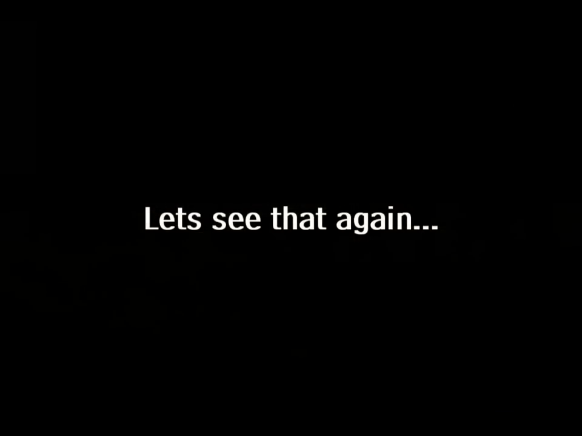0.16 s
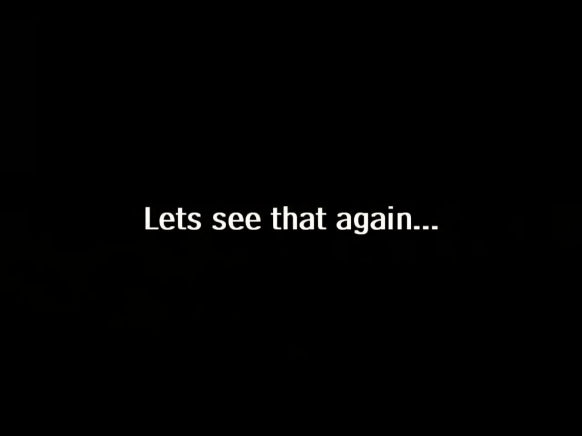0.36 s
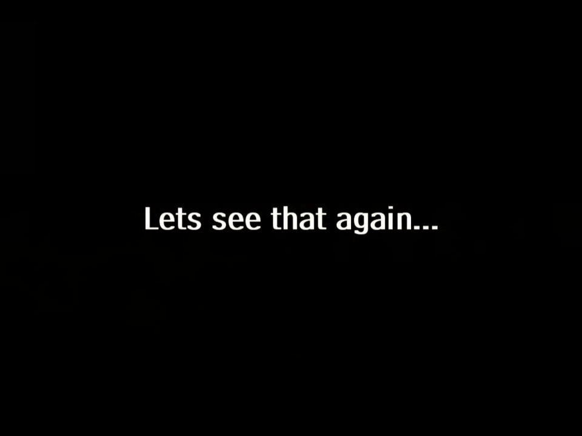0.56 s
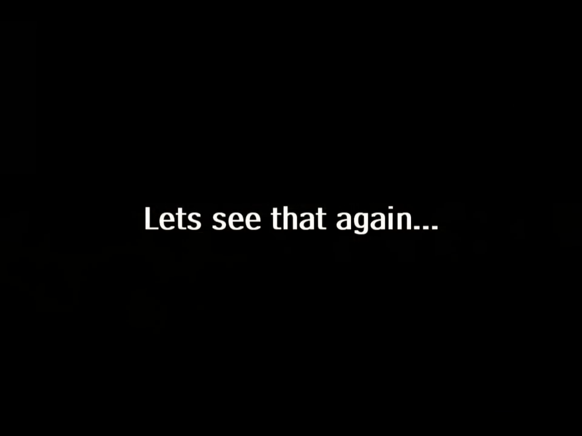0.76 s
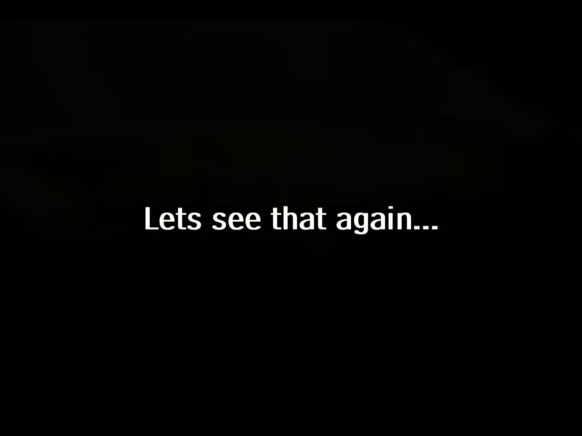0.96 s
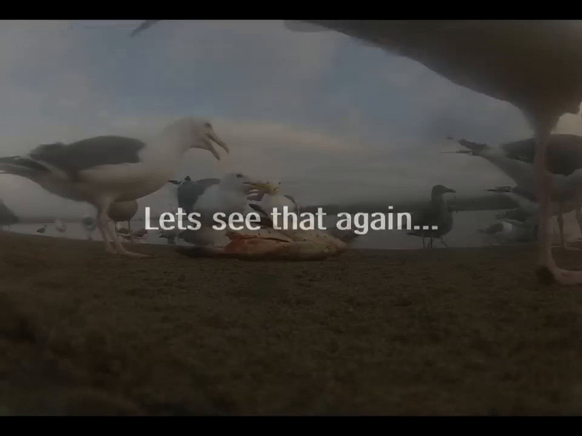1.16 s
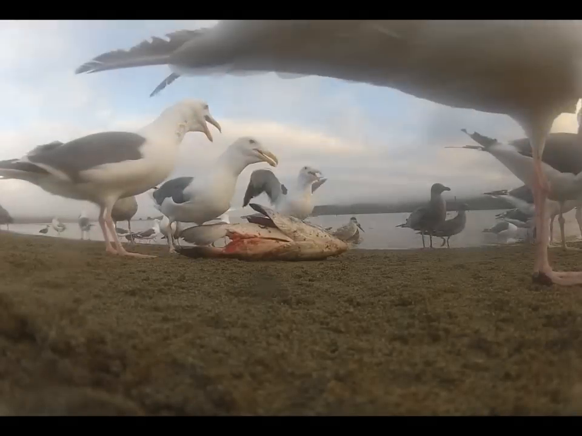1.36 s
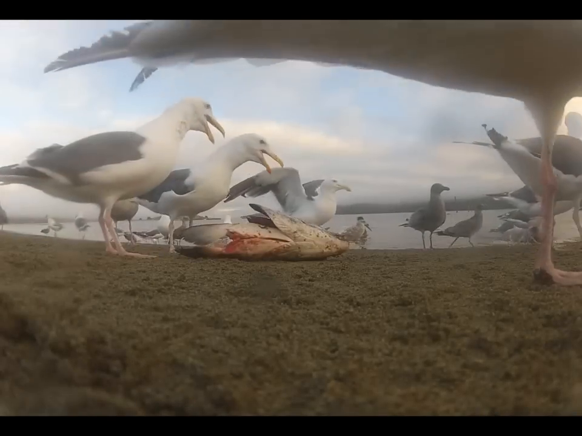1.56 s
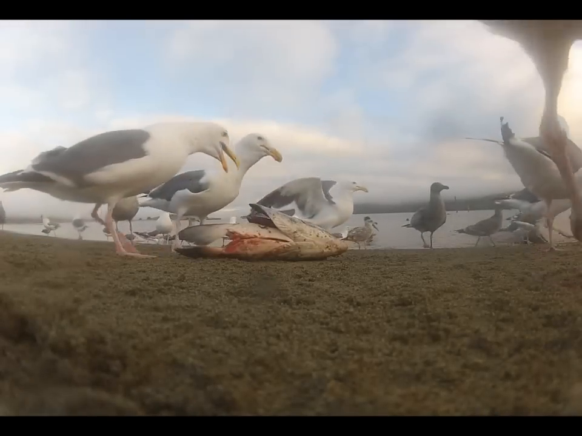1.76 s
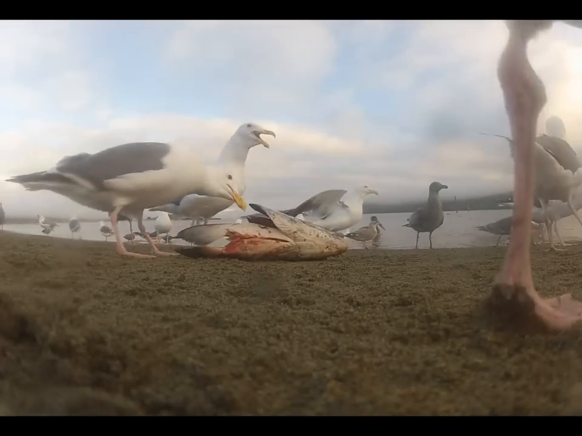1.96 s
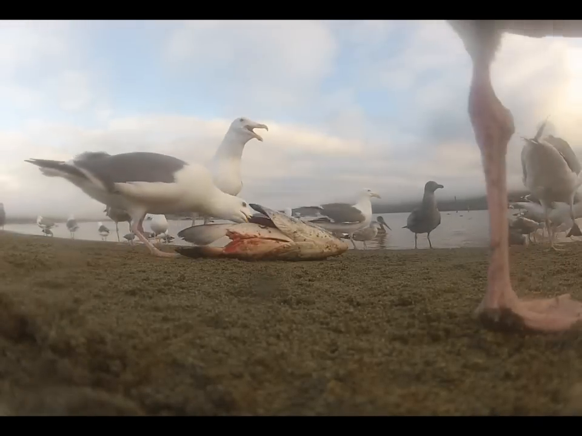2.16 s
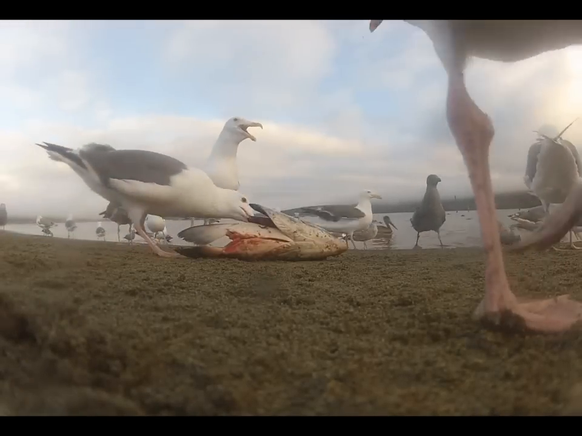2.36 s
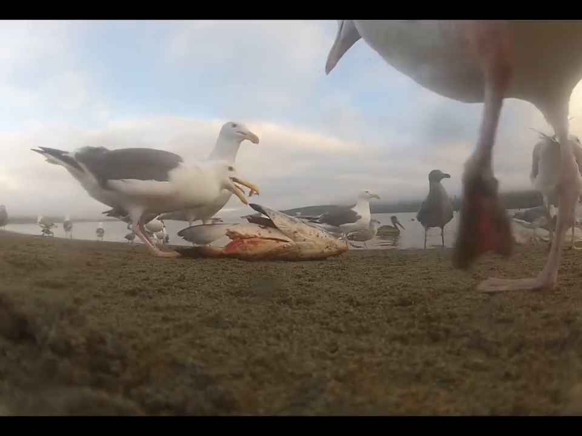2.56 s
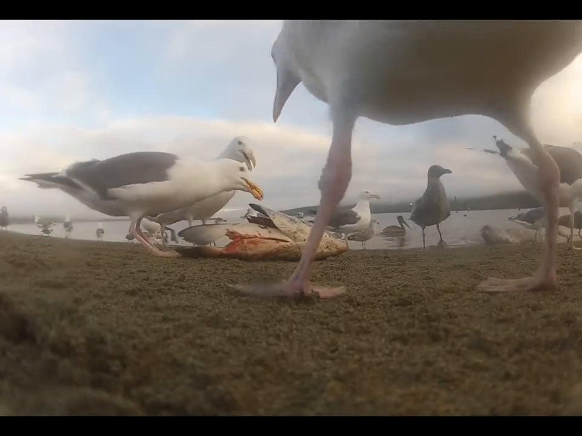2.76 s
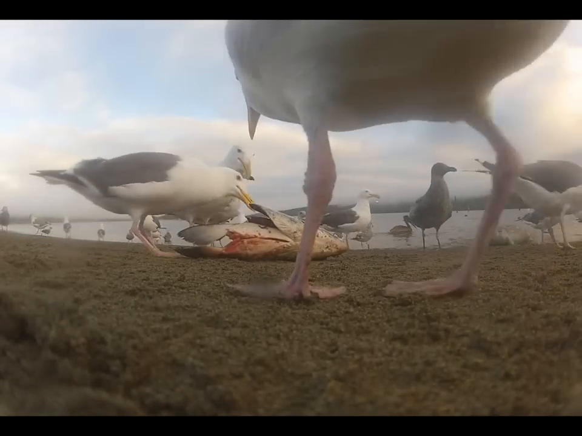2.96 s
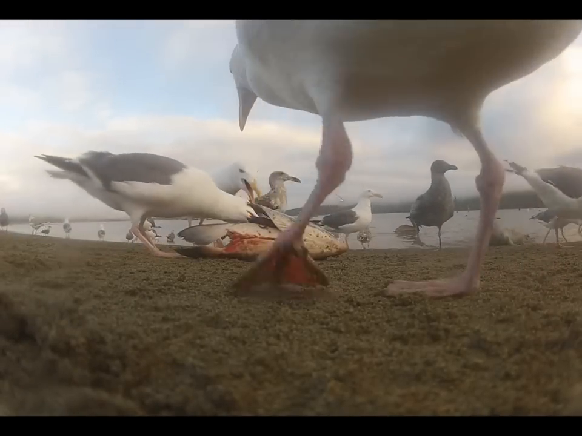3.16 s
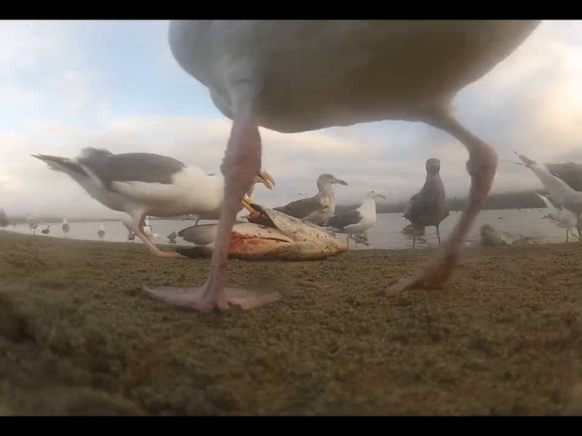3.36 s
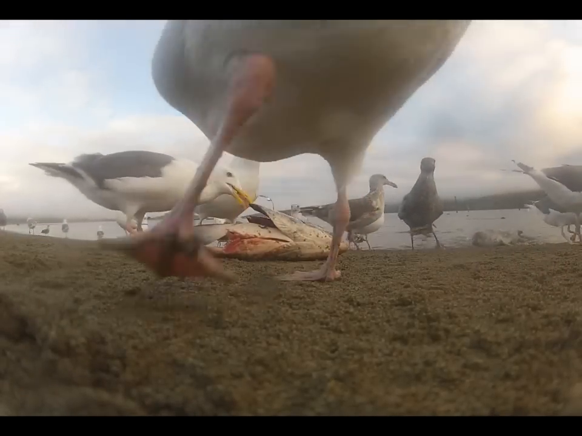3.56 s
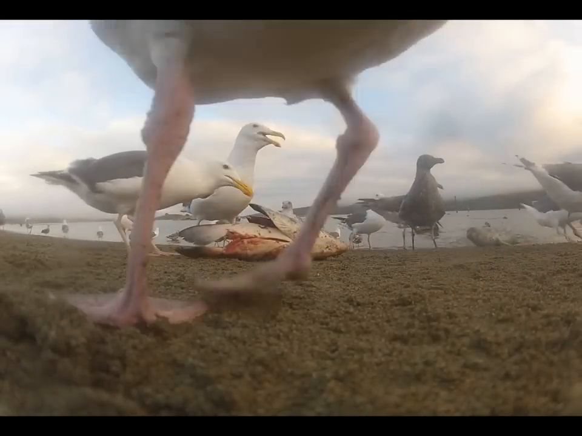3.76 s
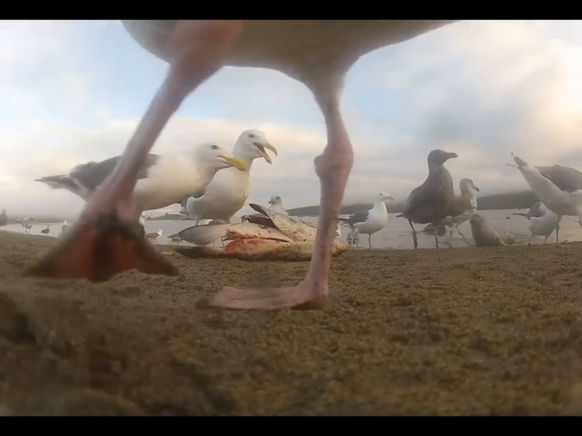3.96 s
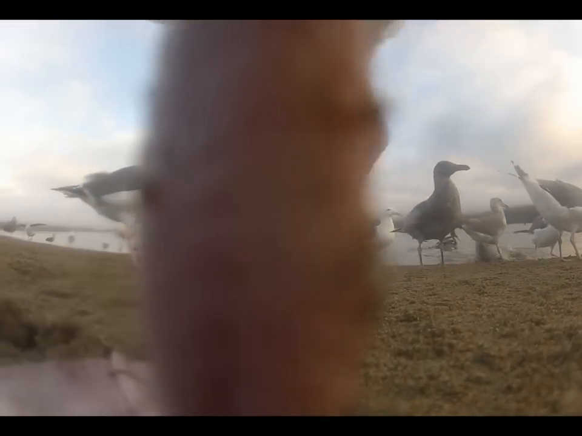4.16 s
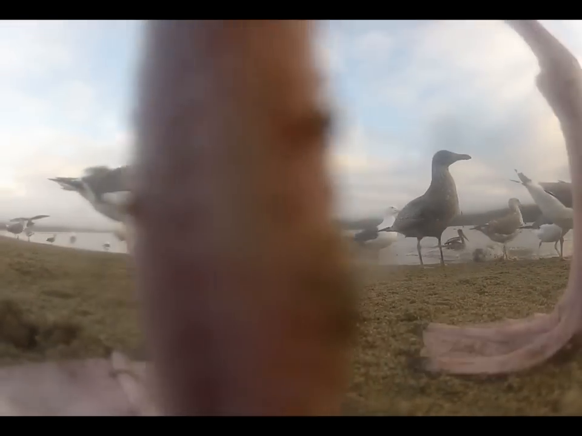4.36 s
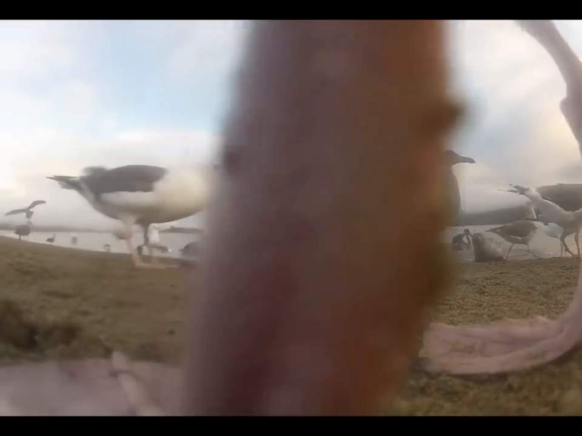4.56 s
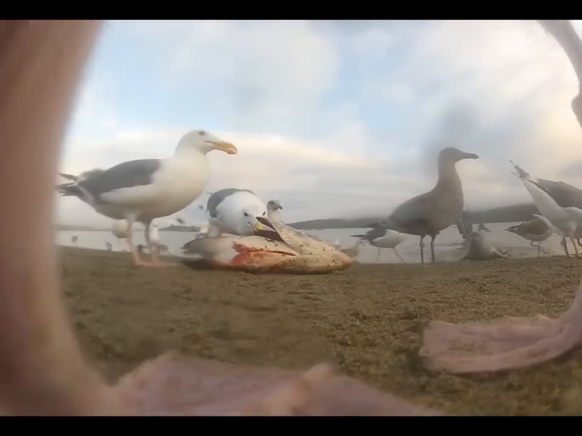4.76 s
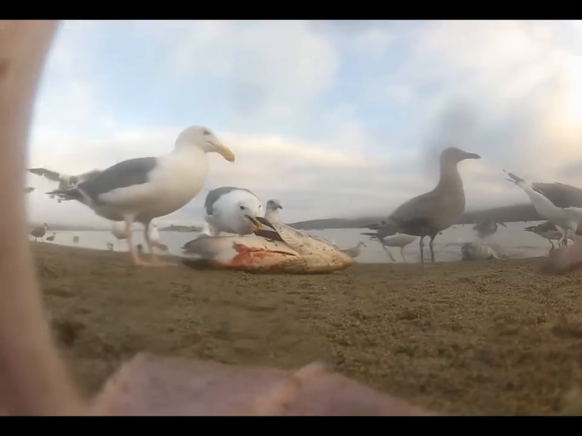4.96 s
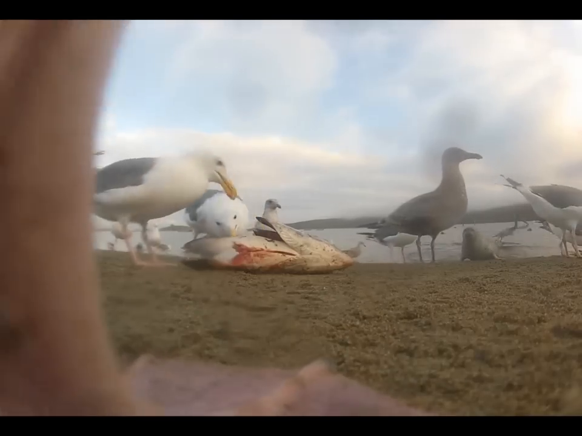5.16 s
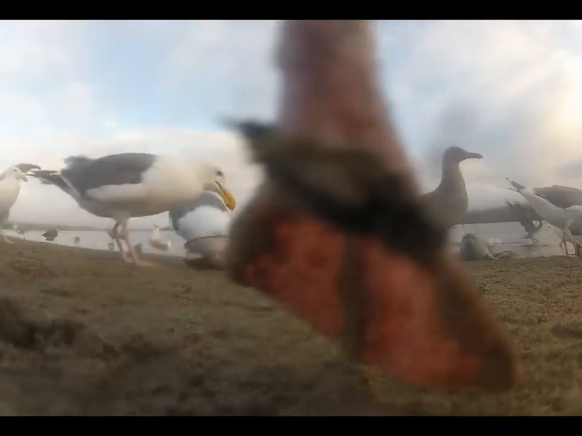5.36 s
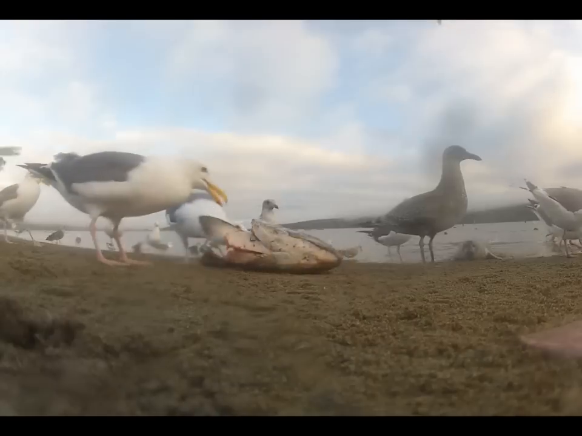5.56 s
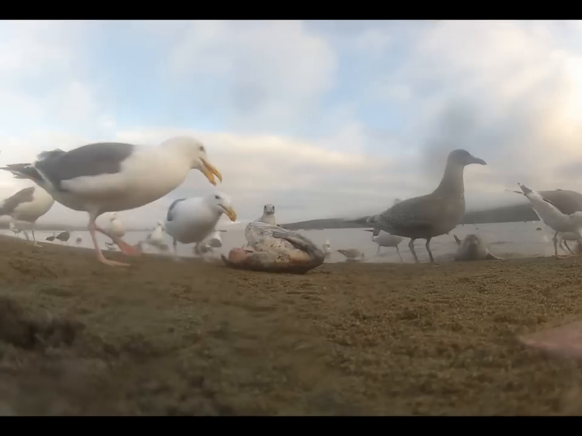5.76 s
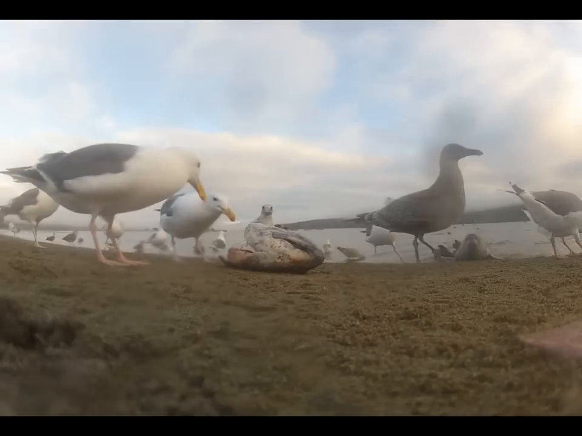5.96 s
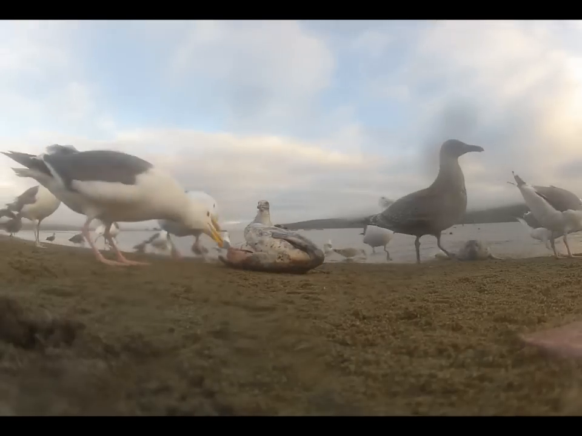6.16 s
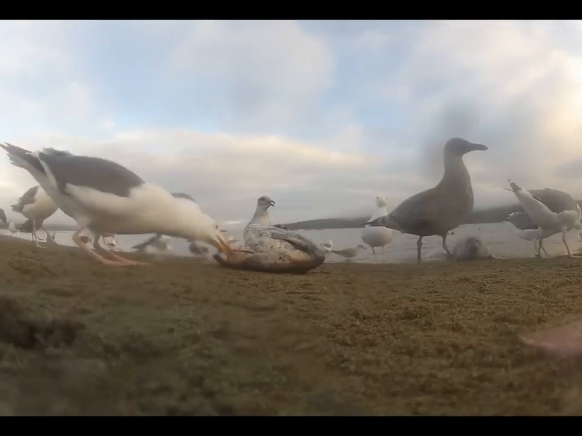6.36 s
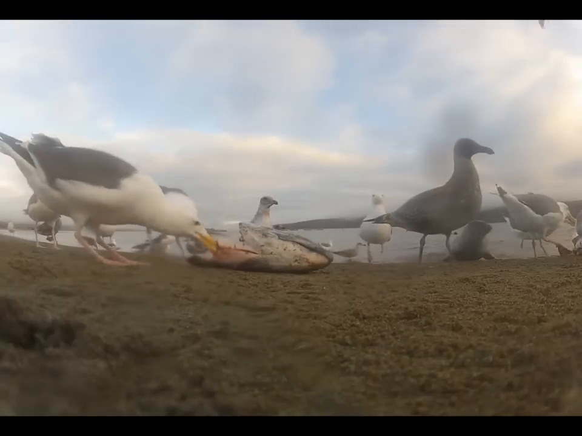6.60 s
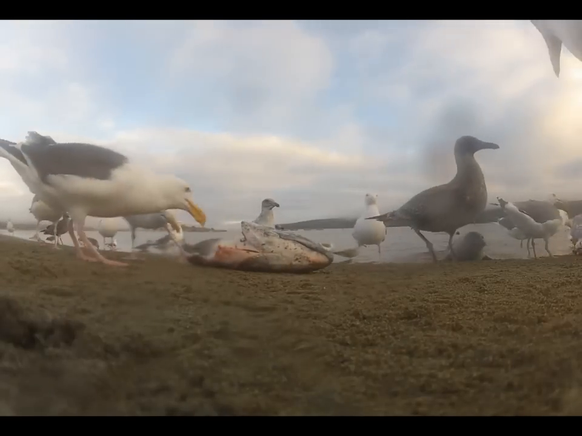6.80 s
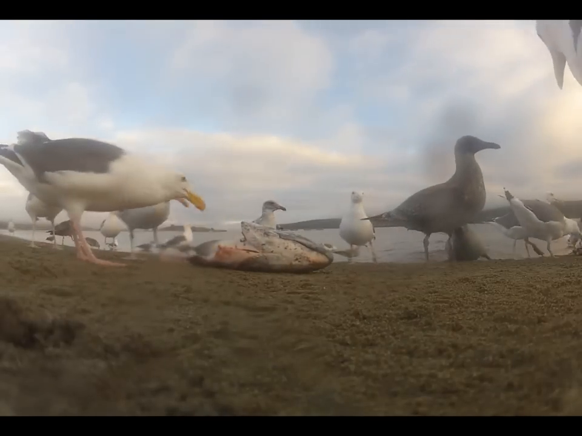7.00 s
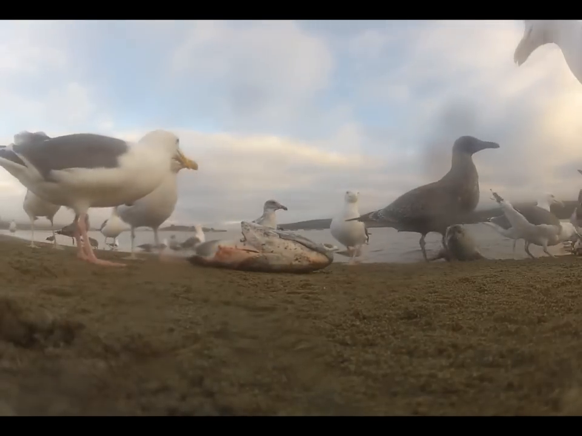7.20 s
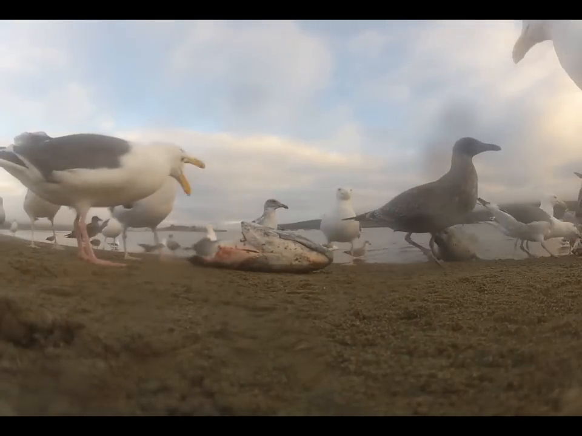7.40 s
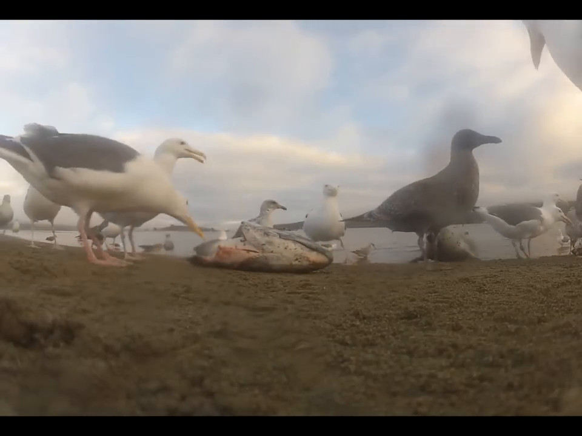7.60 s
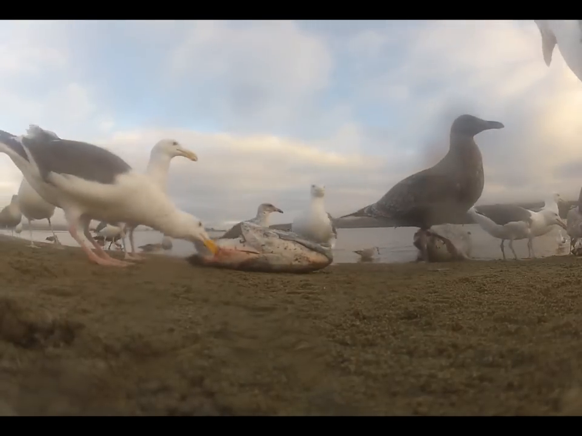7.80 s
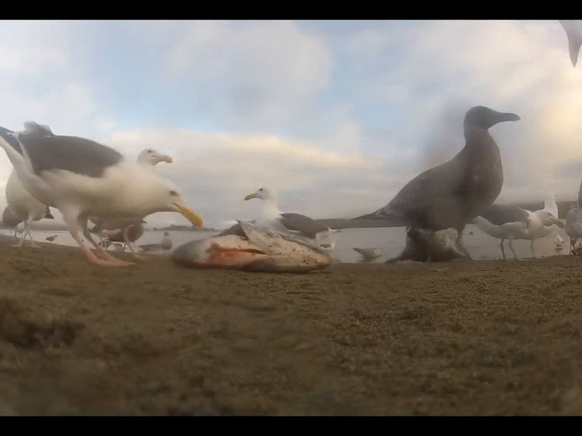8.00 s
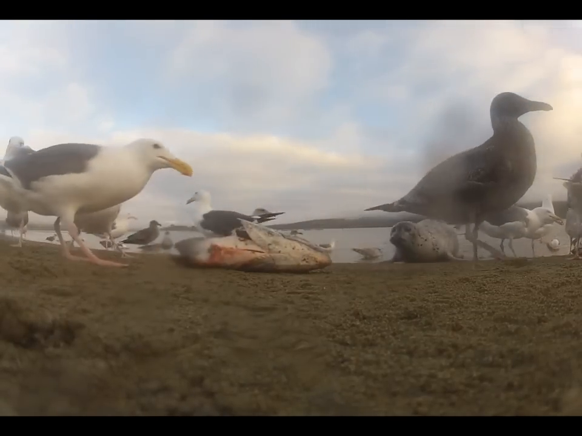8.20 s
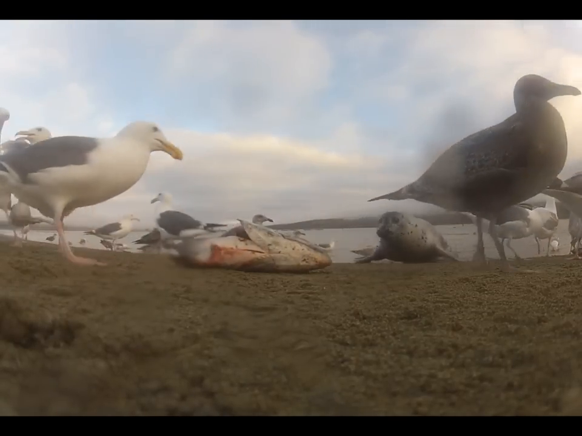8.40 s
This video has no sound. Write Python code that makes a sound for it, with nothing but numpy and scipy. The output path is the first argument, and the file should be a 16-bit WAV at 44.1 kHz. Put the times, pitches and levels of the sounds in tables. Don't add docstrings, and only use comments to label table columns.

```python
import sys
import numpy as np
from scipy import signal
from scipy.fft import rfft, irfft
from scipy.io import wavfile
from scipy.ndimage import uniform_filter1d

SR = 44100
rng = np.random.default_rng(int(sys.argv[2]) if len(sys.argv) > 2 else 0)


def generate_wav(signal):
    frames = np.transpose(np.atleast_2d(signal))
    scaled = np.clip(frames, -1, 1) * 32767
    pcm = np.round(scaled).astype(np.int16)
    wavfile.write(sys.argv[1], SR, pcm)


def nominal_scale(level):
    x = np.asarray(level, float) / 20
    return 10 ** x


N = 372204
NOISE_POOL = rng.standard_normal(3 * N)

# frequency in Hz, level in dB per Hz.
SHELL_COLOUR = [(240, -20), (400, -29), (628, -11), (1130, 7), (1510, -21.5), (1790, 9.5), (2050, -2.5),
                (2420, 6), (3360, -1.5), (3760, 1.5), (4450, -17.5), (4980, -8.5), (5900, -27), (7670, -83),
                (13000, -120)]
# frequency in Hz, level in dB per Hz.
RATTLE_COLOUR = [(500, -30.5), (900, -7.5), (1300, -7.5), (1800, 3), (2400, 7), (3200, -17), (5200, -16),
                 (6000, -36)]
# time in seconds,
# murmur in dB while a near bird calls, hush in dB in the pauses.
FLOCK_MOOD = [(0, -24, -34.5), (.7, -28, -35.5), (1, -37.5, -17), (1.6, -43, -6), (2.5, -44.5, -6.5),
              (3, -42.5, -4.5), (3.9, -41.5, -13), (4.1, -34.5, -0.5), (4.44, -43, -14), (4.8, -40.5, -4),
              (5.7, -41, -9), (6.3, -37.5, -12), (6.6, -40, -15), (7.05, -39.5, -5.5), (7.7, -46.5, -16),
              (8.44, -35.5, -18.5)]


def unit(x):
    return x / np.sqrt(np.mean(x ** 2))


def colour_db(hz, table):
    table = np.array(table)
    return np.interp(np.log(hz), np.log(table[:, 0]), table[:, 1])


def tinted(x, table):
    hz = np.maximum(np.fft.rfftfreq(len(x), 1 / SR), 1)
    return irfft(rfft(x) * nominal_scale(colour_db(hz, table)), len(x))


def band(x, hz, width_hz):
    return signal.lfilter(*signal.iirpeak(hz, hz / width_hz, fs=SR), x)


def noise(count):
    return NOISE_POOL[rng.integers(N):][:count]


def walk(count, rate):
    k = int(SR / rate)
    smooth = uniform_filter1d(uniform_filter1d(noise(count + 2 * k), k), k)
    return unit(smooth)[k:k + count]


def add(out, start_s, x):
    i = max(int(start_s * SR), 0)
    out[i:i + len(x)] += x[:len(out) - i]


def curve(rows, column):
    rows = np.array(rows)
    return np.interp(np.arange(N) / SR, rows[:, 0], rows[:, column], left=-120, right=-120)


def yelp(start, top, end, start_hz, top_hz, end_hz, partial_db, rough):
    climb_db = (-7, -28.5, -30.5, -36, -36.5)
    fall_db = (0, -10.5, 1.5, -14, -18)
    # frequency in Hz, level in dB.
    throat_colour = [(700, -2.5), (1090, 5), (1420, -5), (1950, -2.5), (2500, 5), (2950, 4), (3450, 4.5),
                     (3880, -5)]
    t = np.arange(start, end, 1 / SR)
    rise = np.clip((top - t) / max(top - start, 1e-3), 0, 1)
    fall = np.clip((t - top) / max(end - top, 1e-3), 0, 1)
    hz = top_hz + (start_hz - top_hz) * rise ** 2 + (end_hz - top_hz) * fall ** 2.1
    broken = 1 / (1 + np.exp((t - top + 0.0513) / .004))
    hoarse = rough * (.05 + .15 * broken + .9 * rise ** 2.2 + .2 * fall ** 4)
    shaky_hz = hz * (1 + .003 * walk(len(t), 60) + .1 * hoarse * walk(len(t), 350))
    phase = 2 * np.pi * np.cumsum(shaky_hz) / SR
    edges = np.sin(np.pi / 2 * np.clip(np.minimum(t - start, end - t) / 0.01, 0, 1))
    climb_share = 0.74 * min((top - start) / 0.058, 1)
    out = 0
    for k, db in enumerate(partial_db, 1):
        slack_db = climb_share * climb_db[k - 1] * rise ** 2.2 + fall_db[k - 1] * fall ** 2
        break_db = (k > 1) * -10 * broken
        slide_db = colour_db(k * hz, throat_colour) - colour_db(k * top_hz, throat_colour)
        flutter = 1 + .2 * walk(len(t), 60) + hoarse * walk(len(t), 250)
        out = out + nominal_scale(db + slack_db + break_db + slide_db) * flutter * np.sin(k * phase + k)
    return np.sqrt(2) * edges * out


def growl(length, start_hz, end_hz, breathy, colour):
    t = np.arange(0, length, 1 / SR)
    hz = np.interp(t, [0, length], [start_hz, end_hz]) * (1 + .01 * walk(len(t), 80))
    gate = np.cos(np.pi * np.cumsum(hz) / SR) ** 40
    air = unit((0.29 + gate) * noise(len(t)))
    source = unit(gate - gate.mean()) * (1 - breathy) + breathy * air
    swell = np.sin(np.pi * (t / length) ** 1.3) ** .6 * nominal_scale(3 * walk(len(t), 40))
    return unit(tinted(source, colour)) * swell


def adult(start, top, end, start_hz, top_hz, end_hz, partial_db, rasp_db):
    side_db = (-1, -11, -6, 0)
    lead, stop = start - .05, max(start, top - .015)
    note = np.zeros(int((max(end, stop) - lead + .05) * SR))
    add(note, .05, yelp(start, top, end, start_hz, top_hz, end_hz, partial_db, rough=.6))
    cleared = max(top - .045, start + .01)
    side = yelp(start, cleared, cleared + .018, .75 * start_hz, .72 * top_hz, .66 * top_hz,
                partial_db[:4] + np.array(side_db), rough=4.5)
    add(note, .065, side)
    add(note, 0, nominal_scale(rasp_db) * growl(stop - lead, start_hz / 4, top_hz / 4, .6, RATTLE_COLOUR))
    return lead, note[int(max(-lead, 0) * SR):]


def adults():
    # time of the top in seconds, climb in seconds, top pitch in Hz,
    # level in dB, fundamental in dB against that level.
    BARKER = [(.072, 0.046, 1349, -31.5, -14.5), (.388, 0.055, 1338, -35, -8.5),
              (.723, 0.069, 1324, -30.5, -10.5), (1.048, 0.057, 1323, -29.5, -14),
              (1.365, 0.04, 1322, -35.5, -18), (2.085, 0.11, 1276, -44, -4.5),
              (5.725, 0.011, 1222, -49.5, -4.5), (6.845, 0.013, 1158, -44.5, -7)]
    WAILER = [(.002, 0.0022, 1442, -40, -9), (.316, 0.13, 1442, -38, -11.5), (.661, 0.14, 1487, -38, -9.5),
              (1.742, 0.11, 1446, -29, -13.5), (1.308, .07, 1435, -30.5, -18)]
    YAPPER = [(2.802, 0.011, 1210, -61, 4), (3.556, .012, 1214, -55, 7), (2.032, 0.044, 1265, -31.5, -12.5),
              (2.348, 0.049, 1209, -38.5, -8.5), (3.164, 0.086, 1248, -34, -10.5),
              (3.532, 0.052, 1266, -29, -12.5), (3.885, 0.053, 1298, -26.5, -17.5),
              (4.235, 0.044, 1210, -35.5, -7), (4.615, 0.06, 1150, -44, -3), (4.985, 0.06, 1245, -41, -3)]
    CLIPPER = [(5.605, .025, 1165, -41, -10), (2.395, 0.074, 1400, -50, 8.5),
               (5.412, 0.028, 835, -45.5, -4.5), (1.075, .03, 1200, -45, -1.5),
               (2.784, .05, 1260, -35, -5.5)]
    DRAWLER = [(.992, .125, 1533, -40.5, -8)]
    SCOLDER = [(6.232, 0.07, 1038, -50, -2), (6.546, 0.039, 1094, -32, -19)]
    SQUAWKER = [ (7.306, 0.063, 1241, -31, -23.5), (7.543, 0.096, 1063, -38, -20),
                (7.613, 0.055, 1289, -27.5, -23), (7.964, 0.079, 1276, -29, -20.5),
                (8.326, 0.055, 1219, -30.5, -16.5), (8.432, 0.11, 1090, -39.5, -22)]
    PIPER = [(2.999, 0.046, 1320, -41.5, -16), (3.295, 0.059, 1343, -43, -41),
             (3.612, 0.037, 1338, -43, -32), (3.945, 0.061, 1333, -36.5, -9.5)]
    ANSWERER = [(1.385, 0.05, 1466, -29, -15), (6.637, 0.064, 1390, -43.5, -41),
                (6.963, 0.055, 1417, -37, -30), (7.023, 0.019, 1150, -40.5, -10),
                (7.326, 0.048, 1408, -34.5, -34), (7.686, 0.059, 1405, -36, -25.5),
                (8.047, 0.046, 1399, -37, -51)]
    MOANER = [(2.42, 0.02, 1405, -50, -7.5), (5.31, 0.016, 690, -66.5, 11.5)]
    # its notes, climb in Hz per second, fall in seconds, end pitch as
    # a share of the top pitch, then partials 3 to 5 and rasp in dB against the note.
    habits = [
        (DRAWLER, 6300, .048, .84, (-28, -43, -42, -14)),
        (CLIPPER, 4370, 0.037, 0.68, (-28, -40, -40, -12.5)),
        (BARKER, 3400, 0.057, .66, (-20.5, -52, -35, -17)),
        (WAILER, 5700, 0.067, 0.72, (-22.5, -32.5, -36, -16)),
        (YAPPER, 7000, .055, 0.58, (-24, -36.5, -37.5, -16)),
        (SQUAWKER, 8800, 0.069, .66, (-15, -42, -37, -21)),
        (SCOLDER, 9900, 0.051, 0.57, (-10, -27, -26, -17.5)),
        (PIPER, 4500, 0.036, 0.88, (-4.5, -23.5, -37, -22)),
        (ANSWERER, 4500, 0.057, .75, (-17, -32, -45, -45)),
        (MOANER, 700, 0.16, .94, (-31, -49, -50, -17)),
    ]
    # start in seconds, end in seconds, top pitch in Hz, end pitch in Hz,
    # level in dB.
    mews = [
        (2.55, 2.82, 1760, 1620, -53),
        (2.865, 2.93, 1770, 1650, -53),
    ]
    # start in seconds, end in seconds, start pitch in Hz,
    # end pitch in Hz, level in dB.
    growls = [
        (7.075, 7.13, 200, 180, -48),
        (.86, .95, 260, 300, -47),
        (5.5, 5.57, 250, 490, -49),
        (6.44, 6.525, 190, 270, -45),
        (7.42, 7.51, 200, 250, -45),
        (1.57, 1.68, 310, 270, -52),
    ]
    out = np.zeros(N)
    gasp_s = .028
    for notes, climb_rate, fall_s, end_share, (*upper_db, rasp_db) in habits:
        for top, climb, hz, db, low_db in notes:
            partial_db = db + np.array([low_db, 0, *upper_db])
            start_hz = hz - climb_rate * climb
            add(out, *adult(top - climb, top, top + fall_s, start_hz, hz, end_share * hz,
                            partial_db, db + rasp_db))
            gasp = growl(gasp_s, 400, 300, .9, SHELL_COLOUR)
            add(out, top + fall_s - gasp_s / 2, nominal_scale(db + rasp_db + 1.5) * gasp)
    for start, end, hz, end_hz, db in mews:
        octave_db = -10 + .85 * (db + 44)
        partial_db = db + np.array([0, octave_db, -23, -42])
        past_top = start - .4 * (end - start)
        add(out, *adult(start, past_top, end, hz, hz, end_hz, partial_db, db - 35))
    for start, end, start_hz, end_hz, db in growls:
        add(out, start, nominal_scale(db) * growl(end - start, start_hz, end_hz, .18, RATTLE_COLOUR))
    return out


def chuckles():
    # time in seconds, peak level in dB, throat resonance in Hz.
    bursts = [(3.79, -37, 2660), (3.825, -33.5, 2570), (3.1, -34.5, 900), (5.47, -33, 1260),
              (1.289, -24, 1080), (1.289, -29, 2300), (1.312, -34, 1900), (1.268, -35, 3750),
              (1.268, -37, 1900), (1.216, -33, 1080), (1.579, -33, 950), (6.4, -50, 1850),
              (7.177, -39, 2300), (5.81, -33, 1700), (5.891, -35, 1780), (5.9677, -31, 1820),
              (6.049, -28, 1790), (6.136, -30, 1800), (6.295, -30, 1820), (6.3723, -35, 1810),
              (7.09, -29.5, 1840)]
    out = np.zeros(N)
    t = np.arange(0, .045, 1 / SR)
    for s, db, hz in bursts:
        pulses = rng.standard_normal(len(t)) * (0.36 + np.cos(np.pi * 280 * t) ** 6)
        voice = unit(band(band(pulses, hz, 330), hz, 345)) + 0.1 * unit(band(pulses, 1.7 * hz, 500))
        add(out, s - .012, nominal_scale(db - 11.5) * np.sin(np.pi * t / t[-1]) * voice)
    return out


def young():
    # start in seconds, length in seconds, middle
    # pitch in Hz, level in dB.
    STEPS = [(1.04, 0.055, 3680, -48), (2.89, 0.059, 2840, -53.5), (2.257, 0.039, 2980, -48.5),
             (2.296, 0.037, 3765, -39), (3.437, 0.054, 3420, -43), (3.415, .025, 3550, -50),
             (3.48, .02, 2820, -43), (3.405, .03, 2750, -51.5), (3.476, 0.037, 4260, -41),
             (4.62, 0.023, 2970, -45), (4.94, .03, 3050, -52), (6.185, .035, 1850, -48),
             (5.682, 0.044, 3090, -46.5), (5.719, 0.031, 3820, -42), (6.727, 0.041, 2970, -49.5),
             (6.759, 0.039, 3700, -47.5), (7.682, 0.03, 3550, -42.5), (7.709, 0.024, 4340, -50)]
    SAGS = [(4.25, .025, 3150, -46), (7.03, .04, 3300, -54), (7.02, .04, 2950, -54), (7.03, .04, 4450, -60),
            (7.06, .06, 900, -52), (1.09, 0.16, 4600, -61), (1.81, 0.07, 3740, -48.5),
            (2.326, 0.058, 4410, -53), (2.372, 0.12, 4730, -54.5), (2.493, 0.075, 3890, -46.5),
            (3.503, 0.16, 4620, -45), (3.661, 0.065, 3746, -42.5), (3.906, 0.12, 4900, -49.5),
            (3.851, 0.056, 3735, -27), (5.748, 0.15, 4430, -47), (5.919, 0.072, 3950, -52),
            (6.872, 0.073, 4720, -56), (7.905, 0.12, 3800, -48.5)]
    HOLDS = [(.752, 0.1, 2860, -51.5), (1.449, 0.078, 3720, -54.5), (2.191, 0.057, 2750, -51),
             (3.69, 0.25, 3030, -57), (4.925, .03, 3810, -57), (5.3, .1, 3160, -75.5),
             (5.294, 0.13, 3920, -60), (6.77, 0.11, 3100, -58), (6.786, 0.094, 4370, -60),
             (7.123, 0.12, 3200, -59)]
    TAPERS = [(4.745, .18, 4480, -57), (5.6, .12, 4200, -64), (5.56, .16, 3550, -63),
              (6.32, .14, 2800, -51), (7.725, 0.18, 4725, -54)]
    DROPS = [(2.04, 0.095, 4790, -51.5)]
    EASES = [(6.69, 0.071, 3100, -57.5), (4.25, 0.032, 2200, -45), (3.851, 0.12, 1780, -35.5),
             (2.56, 0.11, 3400, -62.5), (2.235, .055, 3700, -60), (2.61, 0.043, 4500, -64),
             (3.57, 0.13, 2800, -57), (3.4, .15, 2300, -59)]
    ARCS = [(3.51, .045, 3700, -51), (3.52, .05, 3200, -48.5), (3.43, .05, 3000, -52),
            (4.632, 0.025, 2600, -42), (6.6, 0.074, 2850, -54), (2.055, 0.074, 2800, -50),
            (4.4, 0.053, 6000, -70), (.9, 0.117, 3870, -60), (6.97, 0.078, 3850, -58),
            (7.02, .05, 3200, -54), (1.205, 0.021, 2450, -47), (3.1, .03, 2750, -48.5),
            (2.6, 0.046, 3550, -57), (.497, 0.025, 2650, -50), (.838, 0.052, 2300, -48.5),
            (2.66, 0.07, 2570, -46), (5.25, 0.063, 2720, -54), (5.252, 0.057, 3650, -55),
            (6, 0.033, 4920, -59), (4.265, 0.041, 2500, -42), (4.64, .05, 3350, -46),
            (5.755, .03, 2650, -54), (6.3, .025, 2750, -52), (2.76, 0.09, 2680, -49),
            (1.1, 0.13, 2860, -55), (1.3, 0.11, 3880, -62)]
    # its notes, glide in Hz per second, share of the glide
    # kept for both ends, bow of the middle in Hz.
    whistles = [
        (STEPS, 8700, 0.44, -36),
        (SAGS, -3600, 0.547, 0),
        (HOLDS, -1150, 0.4, 0),
        (TAPERS, -2000, .6, 30),
        (DROPS, -2500, .1, 290),
        (EASES, -2400, 0.06, -61.5),
        (ARCS, -300, .1, 125),
    ]
    out = np.zeros(N)
    for notes, glide, ends, bow_hz in whistles:
        for start, length, middle_hz, db in notes:
            t = np.arange(0, length, 1 / SR)
            u = 2 * t / length - 1
            bend = (1 - ends) * u + ends * u ** 3
            hz = middle_hz + glide * length / 2 * bend + bow_hz * (1 - u ** 2)
            hz = hz * (1 + 0.0033 * walk(len(t), 52))
            edges = np.clip(np.minimum(t, (t[-1] - t) / 3.2) / 0.0049, 0, 1)
            fade_db = 5 * (glide < 0) * (t / length) ** 2
            swell_db = 4 + 0.93 * walk(len(t), 40) - fade_db
            tone = np.sin(2 * np.pi * np.cumsum(hz) / SR)
            add(out, start, np.sqrt(2) * nominal_scale(db + swell_db) * edges * tone)
    return out


def foot():
    # frequency in Hz, width in Hz, level in dB.
    shell = [(1917, 177, 6.5), (2390, 240, 4.5), (3550, 560, 1), (1160, 410, -4), (4670, 2500, -37.5)]
    # start in seconds, end in seconds, grit in dB at the start,
    # grit in dB at the end, rumble in dB.
    drags = [(3.979, 4.023, -20, -17, -30), (4.02, 4.087, -23, -27, -30), (4.104, 4.187, -29, -32.5, -38.5),
             (4.175, 4.263, -59, -36.5, -47), (4.264, 4.318, -34, -28.5, -48), (4.31, 4.389, -39, -46, -43),
             (4.39, 4.465, -66, -58, -55), (4.61, 4.668, -46, -52, -48), (4.46, 4.554, -45, -41, -43.5),
             (4.549, 4.615, -42, -32.5, -47), (4.664, 4.699, -29, -22.5, -40.5),
             (4.697, 4.736, -34.5, -15.5, -34.5), (4.715, 4.811, -40.5, -45.5, -52.5),
             (5.206, 5.244, -46, -36, -53), (5.3, 5.698, -68, -66, -57.5)]
    # time in seconds, peak in dB, ring in Hz.
    snaps = [(3.9827, -9, 2560), (4.0452, -15, 2370), (4.1794, -37, 2440), (4.2845, -16.5, 3600),
             (4.3093, -16.5, 3550), (4.4936, -20, 2070), (4.5942, -18, 2440), (4.6708, -42, 2020),
             (4.679, -15.5, 1420), (4.7054, -5, 1880), (4.7223, -18.5, 1870), (4.7359, 0, 2360),
             (4.7379, -3.5, 1930), (5.205, -17.5, 2980), (5.218, -12.5, 2280), (5.224, -19, 1880)]
    # time in seconds, peak in dB, pitch in Hz, spread in seconds.
    knocks = [(3.9874, 8.5, 100, 0.0013), (3.996, -15, 90, 0.0023), (4.056, -20.5, 100, 0.0042),
              (4.109, -24, 59, 0.0099), (4.186, -26.5, 79.6, 0.0072), (4.298, -30.5, 113, 0.0029),
              (4.521, -27, 57.6, 0.0076), (4.701, -28, 60, 0.0071), (4.738, -19, 302, 0.0021),
              (4.759, -31, 63.3, 0.014), (5.239, -45, 88.5, 0.018), (5.65, -46, 95, 0.026),
              (1.52, -57, 96, .04), (3.5, -53.5, 94, .04), (6.39, -55, 93, .04), (8.003, -56, 93.7, 0.11),
              (2.937, -28.5, 480, 0.00031), (3.556, -32, 514, 0.00088), (6.073, -37.5, 537, 0.0012)]
    grains = (rng.random(N) < 3500 / SR) * rng.standard_normal(N)
    grit = grains * nominal_scale(2.0 * rng.exponential(size=N)) * nominal_scale(2.0 * walk(N, 70))
    scrape = 0
    for k, (hz, width_hz, db) in enumerate(shell):
        scrape = scrape + (-1) ** k * nominal_scale(db) * band(grit, hz, width_hz)
    scrape = unit(scrape)
    rock = unit(band(rng.standard_normal(N), 90, 127) * nominal_scale(3.3 * walk(N, 50)))
    out = np.zeros(N)
    for start, end, start_db, end_db, rumble_db in drags:
        i = np.arange(int(start * SR), int(end * SR))
        edges = np.clip(np.minimum(i - i[0], i[-1] - i) / (0.0057 * SR), 0, 1)
        scraping = scrape[i] * nominal_scale(np.linspace(start_db, end_db, len(i)))
        out[i] += edges * (scraping + rock[i] * nominal_scale(rumble_db))
    t = np.arange(0, .012, 1 / SR)
    for s, db, hz in snaps:
        crack = band(rng.standard_normal(len(t)), 3200, 4000) * np.exp(-t / 0.0013)
        ring = np.sin(2 * np.pi * hz * t) * np.exp(-t / .0012)
        add(out, s, nominal_scale(db) * (0.71 * ring + 0.83 * crack))
    for s, db, hz, spread in knocks:
        t = np.arange(-3 * spread, 3 * spread, 1 / SR)
        thump = np.sin(2 * np.pi * hz * t) * np.exp(-.5 * (t / spread) ** 2)
        add(out, s + t[0], nominal_scale(db) * thump)
    return out


def flock():
    far = np.zeros(N)
    for s, length, hz, db in rng.random((260, 4)):
        s, length, hz = s * N / SR, .04 + .06 * length, 800 + 750 * hz
        call = yelp(s, s + length / 2, s + length, .85 * hz, hz, .75 * hz, (-7, 0, -13), rough=3.6)
        add(far, s, nominal_scale(-12 * db) * call)
    murmur = tinted(rng.standard_normal(N), SHELL_COLOUR) * nominal_scale(3.1 * walk(N, 43.0))
    return unit(.3 * unit(far) + 0.19 * unit(murmur)) * nominal_scale(curve(FLOCK_MOOD, 1))


def stir(near):
    lead_s, stir_s, stir_level = 0.027, 0.064, nominal_scale(-33.5)
    heard = uniform_filter1d(np.abs(np.roll(near, -int(lead_s * SR))), int(stir_s * SR))
    duck = 1 + uniform_filter1d(np.abs(near), int(.02 * SR)) / nominal_scale(-33.5)
    return nominal_scale(curve(FLOCK_MOOD, 2) * stir_level / (heard + stir_level)) / duck


def surf():
    # frequency in Hz, level in dB per Hz.
    wash_colour = [(12, -35.5), (20, -16), (97, -3), (128, -4), (700, -13), (910, -27.5), (1540, -120)]
    wash = tinted(rng.standard_normal(N), wash_colour) * nominal_scale(1.5 * walk(N, 4))
    return unit(wash) * nominal_scale(-57.5)


def echoes(birds):
    t = np.arange(0, .12, 1 / SR)
    tail = rng.standard_normal(len(t)) * np.exp(-t / 0.019)
    return nominal_scale(-17) * signal.fftconvolve(birds, tail / np.sqrt(np.sum(tail ** 2)))[:N]


def scene():
    near = adults() + chuckles()
    birds, roused = near + young(), stir(near)
    hiss = nominal_scale(-66.5) * roused ** .3 * rng.standard_normal(N)
    mix = birds + echoes(birds) + foot() + flock() * roused + surf() + hiss
    return mix[None]


def blank_faint_bands(low, keep_db, dip_db):
    hz, _, z = signal.stft(low, 12000, nperseg=512)
    power = np.abs(z) ** 2
    patch = uniform_filter1d(uniform_filter1d(power, size=6, axis=1), size=2, axis=2)
    log_patch = uniform_filter1d(np.log(patch + 1e-18), size=19, axis=1)
    around = np.exp(uniform_filter1d(log_patch, size=3, axis=2))
    whole = np.mean(power, axis=1, keepdims=True)
    faint = (patch < whole * nominal_scale(keep_db) ** 2) | (patch < around * nominal_scale(dip_db) ** 2)
    blanked = np.where(faint & (hz[:, None] > 3500), .04 * z, z)
    return signal.istft(blanked, 12000, nperseg=512)[1][:, :low.shape[1]]


def low_pass(x):
    return signal.sosfilt(signal.butter(12, 16270, fs=SR, output="sos"), x)


def record(dry):
    low = np.clip(signal.resample_poly(dry, 80, 147, axis=1)[:, ::2], -1, 1)
    thinned = blank_faint_bands(low, keep_db=-34.5, dip_db=-3.0)
    held = signal.resample_poly(np.repeat(thinned, 4, axis=1), 147, 160, axis=1)
    held = np.pad(held, ((0, 0), (0, 8)))[:, :N]
    soft = held + 0.167 * (uniform_filter1d(held, size=3, axis=1) - held)
    soft = signal.sosfiltfilt(signal.butter(8, 15300, fs=SR, output="sos"), soft)
    return low_pass(np.clip(soft, -1, 1))


dry = scene()
out = record(dry)
generate_wav(out)
```